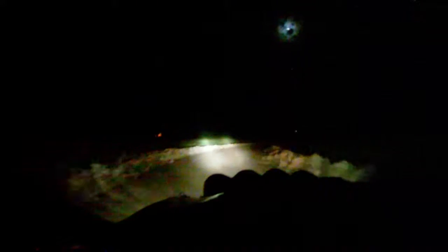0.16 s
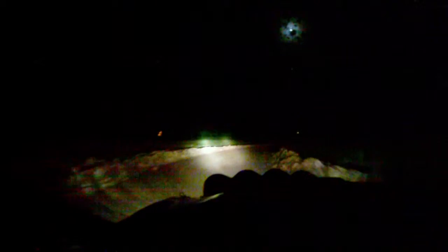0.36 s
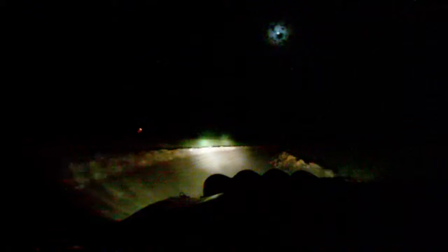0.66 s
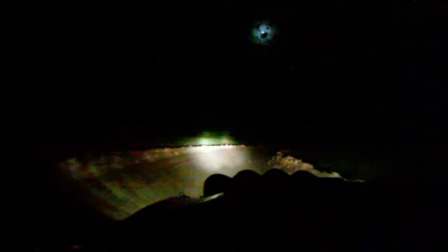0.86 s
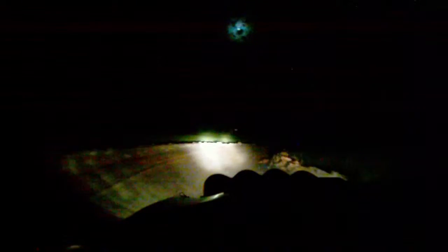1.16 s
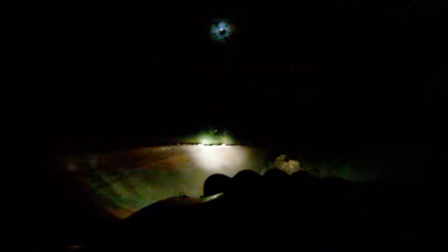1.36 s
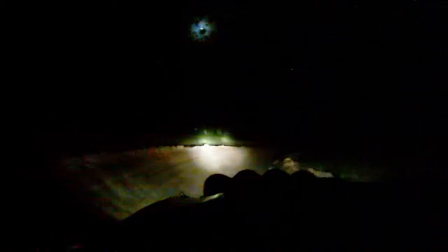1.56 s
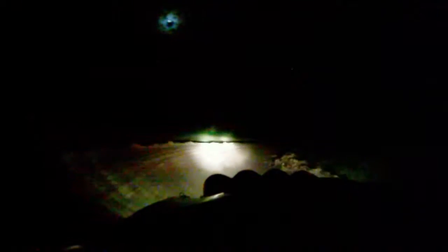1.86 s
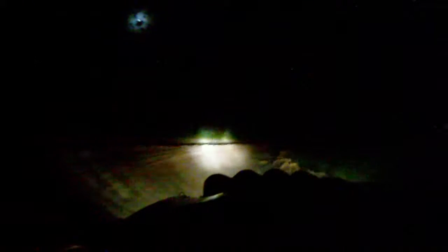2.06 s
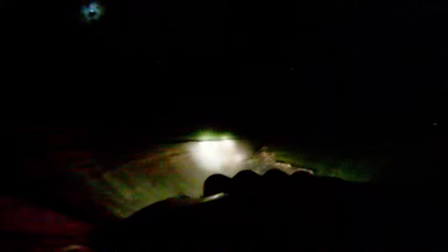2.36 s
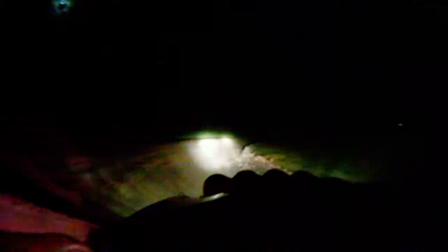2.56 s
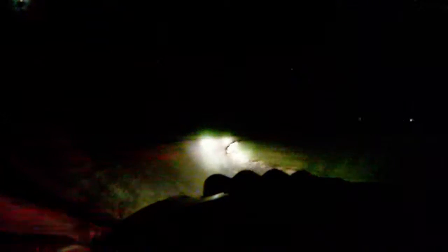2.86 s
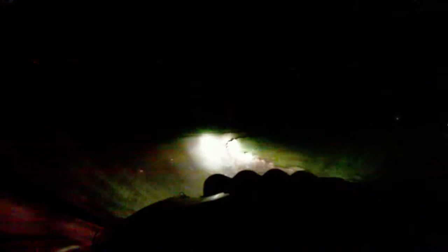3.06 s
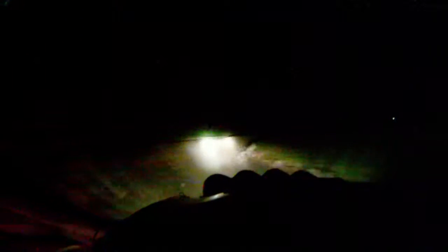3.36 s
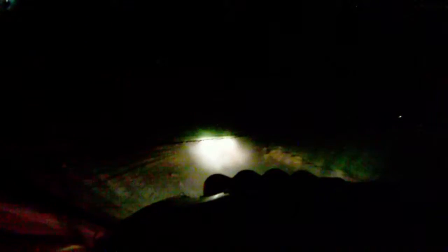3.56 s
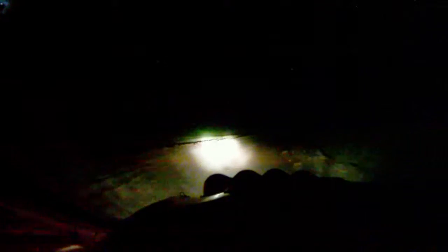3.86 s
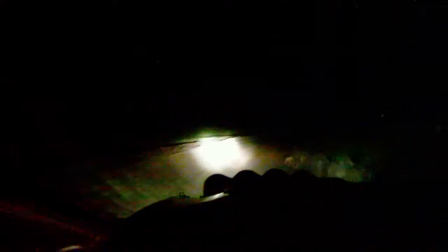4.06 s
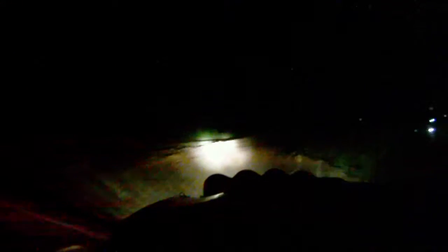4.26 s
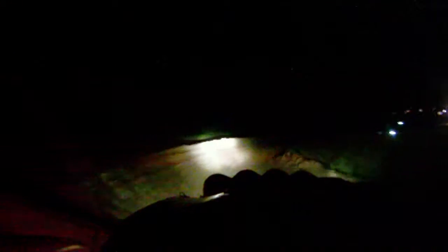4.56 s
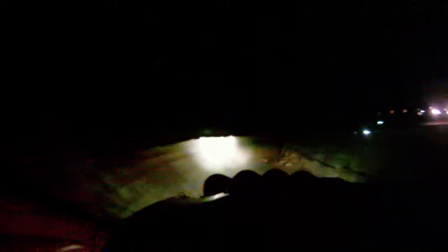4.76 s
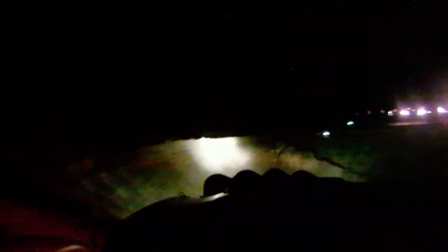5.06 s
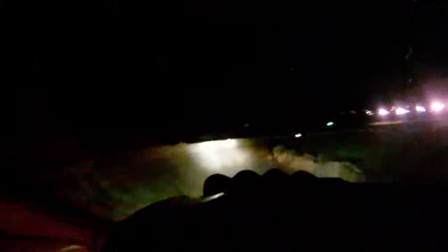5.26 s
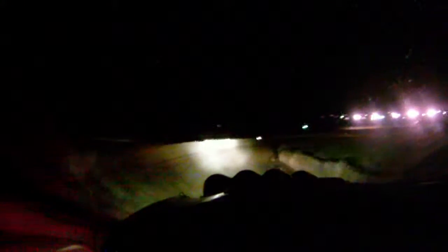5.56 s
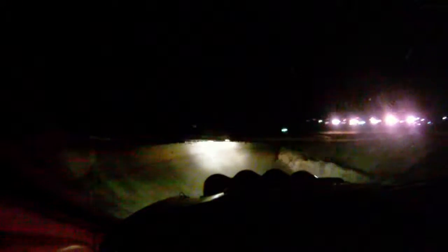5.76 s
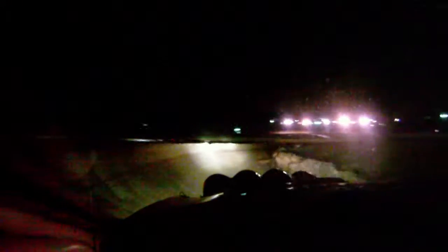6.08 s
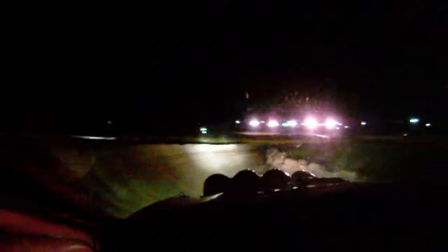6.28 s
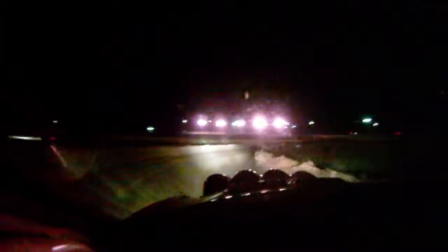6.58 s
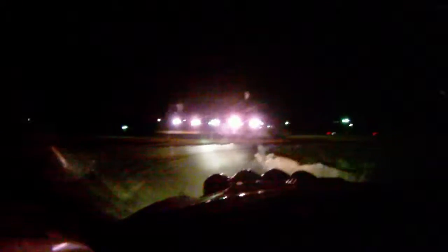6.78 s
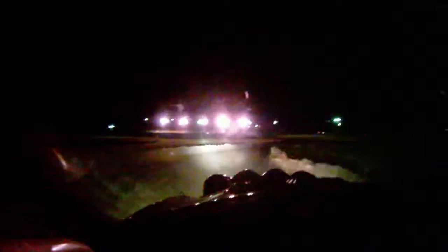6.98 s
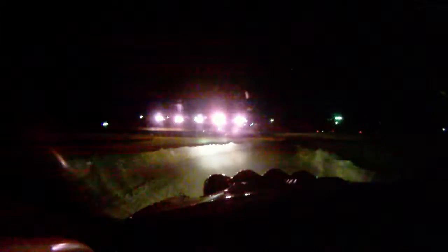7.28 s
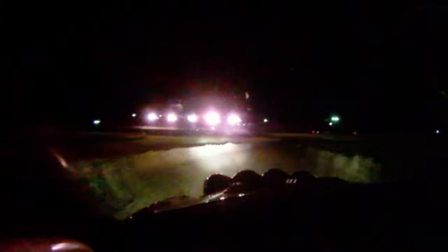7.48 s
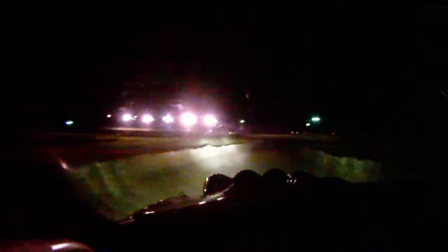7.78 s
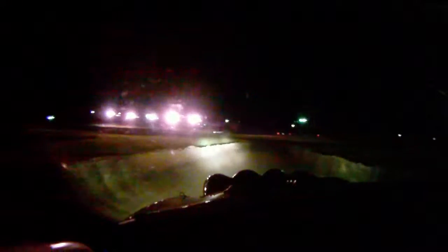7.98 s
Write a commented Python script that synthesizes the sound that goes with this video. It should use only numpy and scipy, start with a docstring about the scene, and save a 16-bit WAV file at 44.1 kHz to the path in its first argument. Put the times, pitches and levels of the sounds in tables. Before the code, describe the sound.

Fine gravel sprays under a fast car while its body rumbles, heard from the cabin through a small, thin-sounding microphone. Sharp, rattling stone strikes on the metal underside keep coming, growing harder after about two seconds and densest in the last two. An early hiss of released boost and scattered short thumps break in, the level dipping briefly after the thumps. The engine and a few thin whistles are very faint.

```python
"""Stones crack against the floor pan and wheel wells of a car driven hard over dirt, heard from inside.
Each blow is a burst of rattling sheet-metal noise over a spray of fine gravel and the body's rumble.
Short thumps and jolts reach the microphone; boost vents as the throttle closes. Far below lie faint
whistles, the engine's firing tones and a thin whine tied to its speed. The small band-limited
microphone turns its gain down after each thump and overloads on the hardest stones."""
import sys
import numpy as np
from scipy import signal
from scipy.fft import rfft, irfft
from scipy.io import wavfile

SR = 44100
rng = np.random.default_rng(int(sys.argv[2]) if len(sys.argv) > 2 else 0)


def to_wav(sig):
    """Store sig (one row per channel, or 1-D mono) as 16-bit WAV at the path in sys.argv[1].

    Samples outside -1..1 are clipped; the rate is SR.
    """
    pcm = np.clip(np.atleast_2d(sig), -1, 1) * 32767
    pcm = np.round(pcm).astype(np.int16)
    wavfile.write(sys.argv[1], SR, pcm.T)  # frames by channels


N = 358533


def from_db(db):
    """Decibels to gain."""
    return 10 ** (np.asarray(db) / 20)


def unit_rms(x):
    """Scaled to rms 1."""
    return x / np.sqrt(np.mean(x ** 2) + 1e-20)


def curves(rows):
    """Each column after the time column, interpolated per sample."""
    times_s, *columns = np.transpose(rows)
    return [np.interp(np.arange(N) / SR, times_s, column) for column in columns]


def gate(start_s, end_s, rise_s, fall_s):
    """Trapezoid envelope."""
    return np.interp(np.arange(N) / SR, [start_s, start_s + rise_s, end_s - fall_s, end_s], [0, 1, 1, 0])


def drift(rate_hz):
    """Slow random wander, rms 1."""
    hop = 40
    pole = np.exp(-2 * np.pi * rate_hz * hop / SR)
    slow = signal.lfilter([1], [1, -2 * pole, pole * pole], rng.standard_normal(N // hop + 2002))[2000:]
    return np.interp(np.arange(N) / hop, np.arange(len(slow)), unit_rms(slow))


def butter(x, kind, hz, order):
    """Causal Butterworth filter."""
    return signal.sosfilt(signal.butter(order, hz, kind, fs=SR, output="sos"), x)


def coloured(x, spectrum, size=4096):
    """Minimum-phase filter with the given spectrum; output rms 1."""
    hz, db = np.transpose(spectrum)
    grid_hz = np.maximum(np.arange(size // 2 + 1), 1) * SR / size
    gain = from_db(np.interp(np.log(grid_hz), np.log(hz), db))
    cepstrum = irfft(np.log(gain))
    cepstrum[1:size // 2] *= 2
    cepstrum[size // 2 + 1:] = 0
    impulse_response = irfft(np.exp(rfft(cepstrum)))
    return unit_rms(signal.fftconvolve(x, impulse_response)[:len(x)])


def resonances(x, centres_hz, width_hz):
    """Two-pole peaks in series; output rms 1."""
    r = np.exp(-np.pi * width_hz / SR)
    for hz in centres_hz:
        x = unit_rms(signal.lfilter([1, 0, -1], [1, -2 * r * np.cos(2 * np.pi * hz / SR), r * r], x))
    return x


def patter(per_s, spread_db, t60_s, steady):
    """Noise whose power jumps at random instants and dies away, over a steady part."""
    sizes_db = spread_db * np.minimum(rng.exponential(1, N), 3.2)
    hits = from_db(2 * sizes_db) * (rng.random(N) < per_s / SR)
    decay = from_db(-120 / (t60_s * SR))
    power = signal.lfilter([1], [1, -decay], hits + 1e-18)
    return np.sqrt(steady + power / power.mean()) * rng.standard_normal(N)


# engine speed (time [s], firing rate [Hz])
FIRING_RATE = [(0, 222), (1.1, 226), (1.27, 186), (1.35, 179.5), (1.5, 211), (1.57, 213.5), (2.03, 197),
               (2.35, 198), (2.5, 208), (2.85, 209), (3.1, 235), (3.5, 235), (3.75, 205), (3.94, 175.5),
               (4.15, 203), (4.3, 212), (4.58, 197), (4.7, 202), (5, 202), (5.15, 208), (5.35, 212),
               (5.5, 223), (5.75, 198), (5.95, 181), (6.48, 189), (6.7, 211), (7.05, 224), (7.15, 211),
               (7.4, 221), (8.13, 242)]
# engine tone levels (time [s], firing tone [dB], upper tones [dB])
ENGINE_LEVELS = [(0, -58, -56), (.45, -53, -52), (.8, -58, -57), (1.3, -59, -58), (1.6, -51, -47),
                 (2.2, -57, -57), (2.8, -51, -48), (3.2, -59, -58), (4.6, -59, -57), (5.2, -49, -45),
                 (5.5, -54, -49), (5.9, -50, -58), (6.5, -51, -57), (6.8, -50, -52), (7.05, -60, -56),
                 (7.25, -58, -43), (7.6, -58, -48), (8.13, -60, -57)]
# engine tones (multiple of firing rate [-], level offset [dB])
ENGINE_ORDERS = [(1, 2), (1.5, -2), (2, 8), (2.5, -3), (3, 2), (4, 2)]


def engine():
    """Low orders of the firing rate, each wavering in level."""
    firings = np.cumsum(curves(FIRING_RATE)[0]) / SR
    firing_db, upper_db = curves(ENGINE_LEVELS)
    out = np.zeros(N)
    for order, offset_db in ENGINE_ORDERS:
        level_db = (firing_db if order == 1 else upper_db) + offset_db + 2.5 * drift(rate_hz=3.2)
        out += from_db(level_db) * np.sin(2 * np.pi * order * firings)
    return out


def whine(order=71.5, level_db=-79):
    """A thin tone locked to engine speed, flickering in level and slightly in pitch."""
    firing_hz = curves(FIRING_RATE)[0] * (1 + .0025 * drift(rate_hz=40))
    firings = np.cumsum(firing_hz) / SR
    return from_db(level_db + 2.5 * drift(rate_hz=25)) * np.sin(2 * np.pi * order * firings)


# whistles (start [s], end [s], pitch [Hz], resonance width [Hz], level [dB])
WHISTLE_SPANS = [(0, 1.1, 6000, 150, -56), (.15, 1, 9500, 120, -82), (3.26, 3.5, 9700, 100, -75),
                 (5.75, 6.25, 780, 20, -39), (7.8, 8.13, 9950, 120, -79)]


def whistles():
    """Faint whistles of narrow-band noise."""
    out = np.zeros(N)
    for start_s, end_s, hz, width_hz, level_db in WHISTLE_SPANS:
        whistle = resonances(rng.standard_normal(N), [hz, hz], width_hz)
        out += from_db(level_db) * gate(start_s, end_s, rise_s=.018, fall_s=.14) * whistle
    return out


# boost releases (start [s], end [s], level [dB])
VENT_BURSTS = [(1.157, 1.46, -26), (3.675, 3.9, -38), (5.7, 5.9, -42)]
# vented air (frequency [Hz], relative density [dB])
VENT_SPECTRUM = [(1200, -15), (2200, -4), (3000, 0), (3900, 1), (5200, -11.5), (8300, -38.5), (13000, -58),
                 (17000, -82)]


def boost_vent():
    """Boost escapes in bursts of hiss as the throttle closes."""
    hiss = coloured(patter(per_s=50, spread_db=2, t60_s=.06, steady=3), VENT_SPECTRUM)
    return hiss * sum(from_db(level_db) * gate(start_s, end_s, rise_s=.006, fall_s=.03)
                      for start_s, end_s, level_db in VENT_BURSTS)


# road noise (time [s], gravel spray [dB], body rumble [dB])
ROAD_LEVELS = [(0, -21, -29.5), (.45, -29, -33), (1.1, -28, -30.5), (1.45, -33, -31), (1.7, -28, -29.5),
               (2.26, -23, -28.5), (2.65, -23, -27), (3.1, -23.5, -28), (3.7, -20.5, -28.5),
               (4.05, -29.5, -31), (4.41, -23, -24), (4.8, -28, -32), (5.46, -23.5, -30.5),
               (5.85, -29.5, -31), (6.4, -27, -34.5), (6.7, -22.5, -30.5), (7.1, -26.5, -26.5),
               (7.6, -20, -26.5), (7.85, -25, -30.5), (8.13, -32.5, -25.5)]
# gravel spray, body rumble, air hiss (frequency [Hz], relative density [dB])
SPRAY_SPECTRUM = [(300, -35.5), (600, -16.5), (1000, -3.5), (1400, -6.5), (2100, -4.5), (2800, -3.5),
                  (3500, -1), (4000, -6), (4800, -14), (6500, -32), (9000, -52), (13000, -81.5)]
RUMBLE_SPECTRUM = [(35, -92), (60, -77.5), (125, -25), (195, -13), (435, -1), (620, 2), (860, 3),
                   (1300, -5), (2000, -6.5), (3000, -56)]
HISS_SPECTRUM = [(2650, -10), (4500, -19.5), (4900, -7.5), (5530, -15), (6180, -11.5), (6800, -24.5),
                 (8660, -35), (15000, -62)]


def road(hiss_re_spray_db=-21.5):
    """Fine gravel on the pan, duller rumble of the body, and a hiss of air that follows the gravel."""
    spray_db, rumble_db = curves(ROAD_LEVELS)
    spray = coloured(patter(per_s=53, spread_db=2, t60_s=.17, steady=.79), SPRAY_SPECTRUM)
    rumble = coloured(patter(per_s=24, spread_db=6, t60_s=.13, steady=5.5), RUMBLE_SPECTRUM)
    hiss = coloured(patter(per_s=39, spread_db=-1.5, t60_s=.05, steady=1.8), HISS_SPECTRUM)
    return from_db(spray_db) * (spray + from_db(hiss_re_spray_db) * hiss) + from_db(rumble_db) * rumble


# jolts to the microphone (time [s], jump [dB], tick [dB])
MIC_JOLTS = [(2.4157, 3, -4), (2.4203, 6, -10), (3.5894, 5, 4), (4.3041, 11, -4), (6.1265, 5, 4),
             (7.3054, 3, 2)]


def jolts(settle_hz=300, tick_lead_samples=6):
    """The jolted microphone gives a downward tick, then a jump that swings back and settles."""
    times_s, jump_db, tick_db = np.transpose(MIC_JOLTS)
    at = np.round(times_s * SR).astype(int)
    jumps, ticks = np.zeros((2, N))
    jumps[at] = from_db(jump_db)
    ticks[at - tick_lead_samples] = from_db(tick_db)
    settling = butter(np.cumsum(jumps), "high", settle_hz, order=2)
    pulse = np.exp(-np.abs(np.arange(-12, 13)) / 2.5)
    return np.convolve(settling, pulse / pulse.sum(), "same") - np.convolve(ticks, pulse, "same")


# thumps (time [s], level [dB], final pitch [Hz], length [s], edge re tone [dB])
THUMP_HITS = [(0.114, -20, 268, 0.0055, 8), (0.216, -21.5, 372, 0.0044, -26),
              (0.867, -24, 277, 0.0042, -11), (1.648, -18, 304, 0.0044, -14), (2.416, 3.5, 567, 0.0088, -1),
              (2.7, -20, 290, 0.0041, -23), (3.447, -22, 326, 0.0064, -18), (3.584, -14, 304, 0.0086, -7),
              (4.298, -3, 335, 0.0092, -6), (4.327, -13, 383, 0.0095, -22), (4.4, -5, 336, 0.0058, -36),
              (4.49, -10, 360, 0.0069, -26), (5.045, -24.5, 303, 0.0106, -22),
              (5.396, -18, 314, 0.0058, -18), (6.123, -11, 319, 0.007, 4), (6.278, -18.5, 260, 0.0034, -11),
              (6.564, -15, 349, 0.0072, 21), (7.299, -9, 298, 0.0055, -21), (7.443, -16, 334, 0.0072, -18)]


def thumps():
    """A noisy edge and a few low cycles that fall quickly to their pitch."""
    out = np.zeros(N)
    for time_s, level_db, hz, length_s, edge_db in THUMP_HITS:
        n, at = int(length_s * SR), round(time_s * SR)
        progress = np.linspace(0, 1, n)
        cycles = np.cumsum(hz * (1 + 1.5 * np.exp(-progress / .15))) / SR
        noise = resonances(rng.standard_normal(SR // 40), centres_hz=[1500, 2500], width_hz=2500)[:n]
        edge = from_db(edge_db) * np.exp(-progress / .35) * noise
        envelope = np.sin(np.pi * progress) ** .7
        out[at:at + n] += from_db(level_db) * envelope * (np.sin(2 * np.pi * cycles) + edge)
    return out


# stone strikes (time [s], level [dB], low panel share [dB], ring pitch [Hz], t60 [s])
STONE_HITS = [(.015, .5, -30, 3200, 0.11), (0.113, -6.5, -18, 2130, 0.11), (.21, -14, -16, 3050, .1),
              (.251, -15, -24, 3730, .06), (.467, -13, -13.5, 3260, 0.084), (.636, -12.5, -26, 3580, 0.1),
              (.671, -13, -21, 2190, 0.07), (0.793, -14, -19, 1330, 0.25), (.876, -10, -18, 3180, 0.2),
              (.946, -1, -19, 2140, .11), (1.026, -21.5, -6, 1000, 0.22), (1.066, -20, -4, 1820, 0.13),
              (1.11, -22, -5.5, 1000, 0.2), (1.206, -14, -25, 2760, 0.23), (1.276, -15, -17, 3730, 0.09),
              (1.373, -17, -20, 3300, 0.037), (1.421, -22, -22, 3040, 0.06), (1.435, -11, -7.5, 1740, 0.15),
              (1.549, -13.5, -9, 1960, 0.13), (1.653, -8.5, -16, 1800, .082),
              (1.675, -12, -32, 3540, 0.082), (1.728, -7.5, -20, 2820, 0.17), (1.762, -9, -22, 3540, 0.07),
              (1.845, -2.5, -18.5, 3440, 0.11), (1.936, 2, -43, 2970, 0.053),
              (1.99, -17, -13.5, 2260, 0.057), (2.026, -22, -15, 2770, 0.23), (2.047, -6.5, -14, 2760, 0.2),
              (2.095, -10.5, -16, 2960, .17), (2.173, -8.5, -9, 3020, 0.12), (2.238, -7, -15, 3440, .046),
              (2.272, -12, -13, 3020, 0.34), (2.329, -9, -18, 3080, .21), (2.351, -0.5, -10, 2080, 0.2),
              (2.366, 6, -17, 2750, 0.11), (2.382, -2.5, -20, 3150, 0.08),
              (2.483, -3.5, -15.5, 3270, 0.096), (2.548, -3, -19.5, 3380, 0.12),
              (2.636, -7.5, -13.5, 2280, 0.33), (2.756, -9, -13, 980, 0.23),
              (2.779, 6.5, -25.5, 3660, 0.094), (2.921, 2, -23, 3640, 0.093), (2.967, 7, -15.5, 2810, .11),
              (3.015, -10, -16, 2770, 0.057), (3.031, -1, -23.5, 3630, 0.24), (3.178, 2.5, -21, 2940, 0.22),
              (3.225, 7, -20.5, 3680, 0.095), (3.399, -4.5, -32, 3730, 0.052),
              (3.423, -14, -29, 3000, 0.068), (3.677, -6.5, -18, 3350, 0.19),
              (3.711, -6.5, -21, 2870, 0.061), (3.741, -11, -27, 3370, 0.28), (3.769, -26, -7, 3470, 0.19),
              (3.835, -24.5, 5, 1040, 0.2), (3.914, -4, -20, 944, 0.096), (3.937, -3.5, -12.5, 1630, 0.15),
              (3.957, 3, -31, 2880, 0.12), (3.971, 9.5, -22, 2780, 0.14), (3.99, 1.5, -9, 2430, 0.17),
              (4.08, -12, -16, 2050, .11), (4.108, -12.5, -13.5, 3030, 0.11),
              (4.261, -21, -25, 2020, 0.061), (4.297, -9, -4, 1190, .04), (4.357, -4, -10.5, 1860, 0.14),
              (4.393, 0, -13, 2970, 0.093), (4.487, -6.5, -8, 1110, 0.037), (4.65, -4.5, -14, 2270, 0.13),
              (5.154, -10.5, -11, 2250, 0.12), (5.264, -10, -33, 3620, 0.16),
              (5.331, 4.5, -23, 3010, 0.078), (5.496, -18, -30, 3740, 0.18),
              (5.522, -.5, -23.5, 3750, 0.094), (5.567, -11.5, -13, 3300, .23),
              (5.721, -10, -16, 3730, 0.19), (5.734, 2, -18.5, 2540, 0.073), (5.811, -11, -23, 2370, 0.19),
              (5.92, -14, -26, 2960, 0.21), (5.941, -5.5, -21, 3470, 0.076), (6.045, -4.5, -28, 2950, 0.14),
              (6.071, -8, -18, 2040, 0.074), (6.106, -4.5, -24, 2950, 0.2), (6.142, 2.5, -30, 3180, .12),
              (6.182, -5.5, -22, 2800, .11), (6.199, -3, -23, 3900, 0.078), (6.218, -6, -10.5, 3040, 0.14),
              (6.336, -16.5, -26, 1470, 0.074), (6.461, -11.5, -21, 3700, 0.27),
              (6.485, -11, -15, 2600, .1), (6.496, 2, -17.5, 2430, 0.1), (6.556, 6, -13, 2720, 0.12),
              (6.637, -6, -22, 3170, 0.13), (6.671, 2, -18.5, 2550, .089), (6.701, -4.5, -16.5, 2700, 0.2),
              (6.738, -7.5, -20, 2990, .047), (6.827, -8.5, -12, 3020, 0.12),
              (6.902, -1.5, -32, 3840, 0.057), (6.937, 3, -18, 2160, 0.21), (7.024, -2, -15, 2980, 0.094),
              (7.081, -11.5, -21, 2160, 0.093), (7.163, -11, -18, 2920, 0.05), (7.29, -10, -20, 2180, 0.11),
              (7.343, -8.5, -27, 3260, .089), (7.374, -11, -23, 3710, 0.1), (7.391, -7.5, -23, 2680, 0.091),
              (7.466, 2.5, -33, 2030, 0.11), (7.467, 1.5, -34, 4000, 0.058), (7.508, -5.5, -24, 2200, 0.16),
              (7.529, -5, -17, 1860, 0.17), (7.56, -7, -25, 1400, 0.084), (7.58, 4.5, -16, 930, 0.11),
              (7.621, 7, -13, 3650, 0.087), (7.657, 0, -21, 3700, 0.097), (7.669, 1, -28, 2940, 0.071),
              (7.686, 3.5, -16.5, 3200, 0.056), (7.698, 2.5, -19, 3080, 0.16),
              (7.736, -7.5, -23, 2960, 0.25), (7.766, 1.5, -41, 2890, 0.06), (7.812, -8.5, -7, 3080, 0.14),
              (7.916, 1.5, -28, 3830, 0.039), (7.945, -12, -22, 4010, 0.13), (8.059, -19, -19, 1020, 0.092)]
# struck sheet metal, bright and low parts (frequency [Hz], relative density [dB])
PANEL_SPECTRUM = [(410, -37.5), (700, -14.5), (1210, -27.5), (1450, -0.5), (2330, 2.5), (2650, 2.5),
                  (3360, 4), (4420, -3.5), (4800, -9.5), (6700, -25.5), (12000, -77), (15600, -102),
                  (22000, -120)]
LOW_PANEL_SPECTRUM = [(200, -60), (350, -17.5), (600, -7), (900, -2), (1400, -3), (2500, -45.5)]


def stones(rise_at_0_db_s=.0036, ring_db=-3.5):
    """Sheet metal has so many modes that a blow is dying, rattling noise, with one band ringing out."""
    rattle = coloured(patter(per_s=270, spread_db=2, t60_s=.029, steady=1), PANEL_SPECTRUM)
    low_panel = coloured(rng.standard_normal(N), LOW_PANEL_SPECTRUM)
    out, t = np.zeros(N), np.arange(SR // 4) / SR
    for time_s, level_db, low_db, ring_hz, t60_s in STONE_HITS:
        at = round(time_s * SR)
        n = min(len(t), N - at)
        rise_s = rise_at_0_db_s * from_db(.5 * level_db)  # harder stones take longer to swell
        envelope = (1 - np.exp(-t / rise_s)) ** .47 * from_db(-60 * t / t60_s)
        envelope = (envelope / envelope.max())[:n]
        ring = resonances(rng.standard_normal(len(t)), [ring_hz, ring_hz], width_hz=450)[:n]
        bright = envelope * (rattle[at:at + n] + from_db(ring_db) * ring)
        low = from_db(low_db) * envelope * low_panel[at:at + n]
        out[at:at + n] += from_db(level_db) * (bright / np.abs(bright).max() + low)
    return out


def scene(blow_top_cut_hz=8220):
    """Everything that reaches the microphone; a lowpass dulls the stones and thumps."""
    blows = butter(stones() + thumps(), "low", blow_top_cut_hz, order=4)
    return (road() + blows + jolts() + boost_vent() + whistles() + engine() + whine())[None]


def gain_control(x, threshold_db=-31, cut_db_per_db=.37, release_db_per_s=29, smoothing_s=.0022):
    """Bass over the threshold turns the gain down; it recovers at a steady rate."""
    bass = butter(x, "low", hz=450, order=4)
    over_db = np.maximum(20 * np.log10(np.abs(bass) + 1e-9) - threshold_db, 0)
    release_db = release_db_per_s * np.arange(N) / SR
    cut_db = np.maximum.accumulate(cut_db_per_db * over_db + release_db) - release_db
    pole = np.exp(-1 / (smoothing_s * SR))
    return x * from_db(-signal.lfilter([1 - pole], [1, -pole], cut_db))


def record(dry, self_noise_db=-75, overload=.9, top_cut_hz=16000):
    """Small microphone: gain control, bass cut, self-noise, hard overload, bass shelf, steep top cut."""
    thin = butter(gain_control(dry[0]), "high", hz=159, order=4)
    hiss = butter(rng.standard_normal(N), "high", hz=3000, order=2)
    clipped = np.clip(thin + from_db(self_noise_db) * hiss, -overload, overload)
    shelved = clipped - .7 * butter(clipped, "low", hz=303, order=1)
    return signal.sosfilt(signal.cheby2(24, 85, top_cut_hz, fs=SR, output="sos"), shelved)


dry = scene()
out = record(dry)
to_wav(out)
```